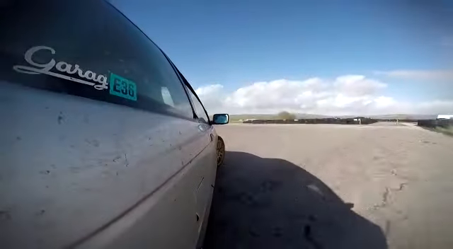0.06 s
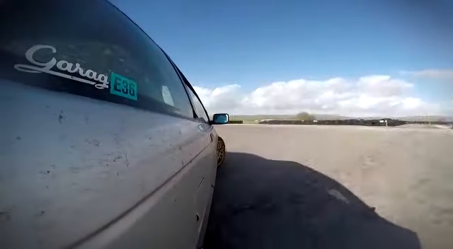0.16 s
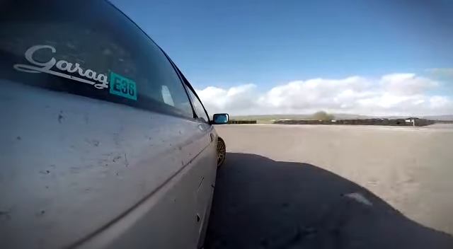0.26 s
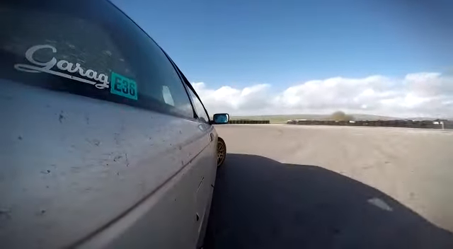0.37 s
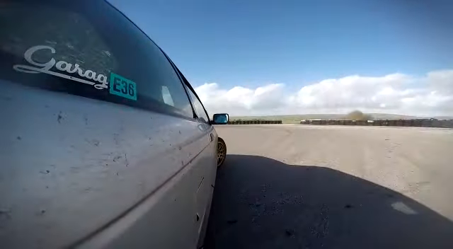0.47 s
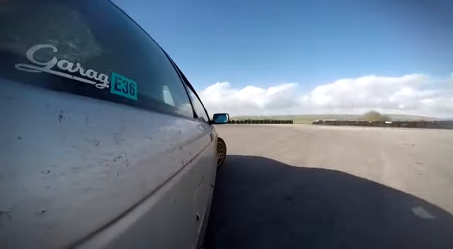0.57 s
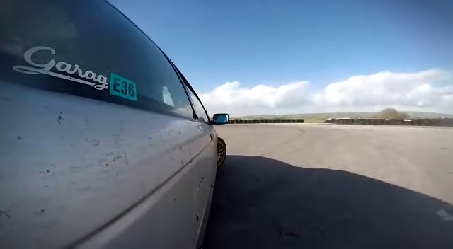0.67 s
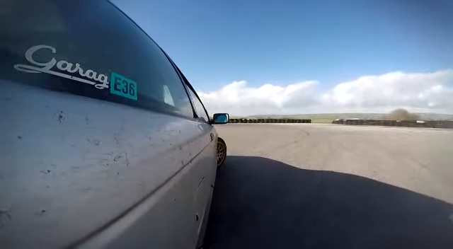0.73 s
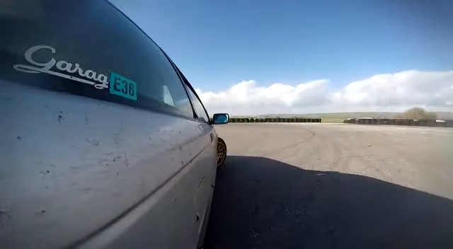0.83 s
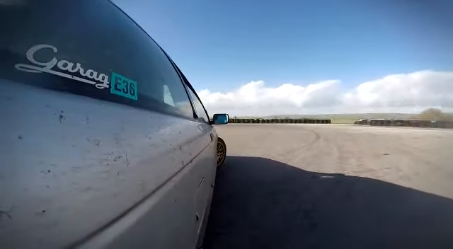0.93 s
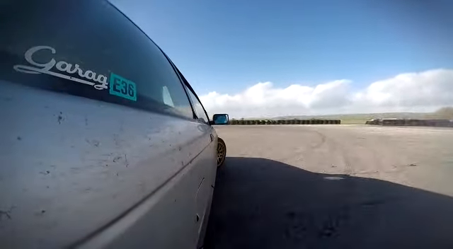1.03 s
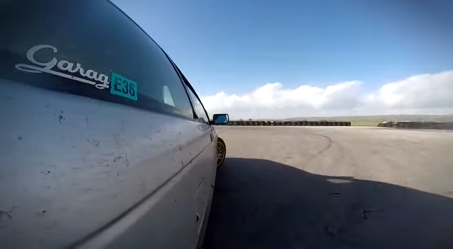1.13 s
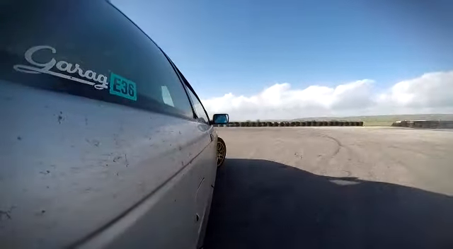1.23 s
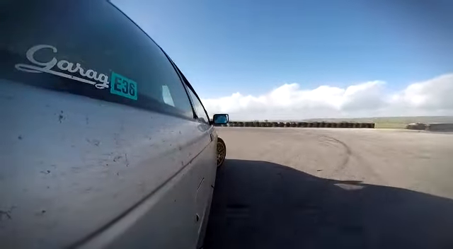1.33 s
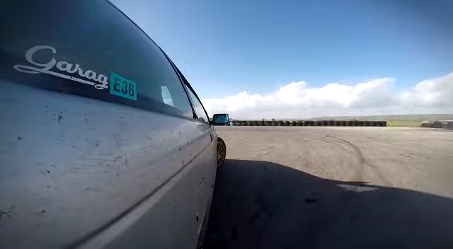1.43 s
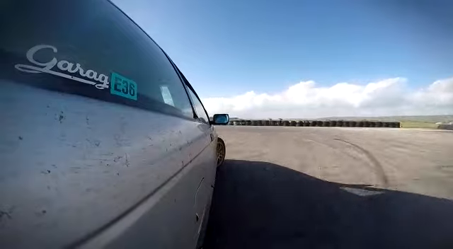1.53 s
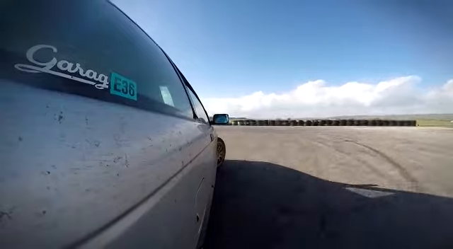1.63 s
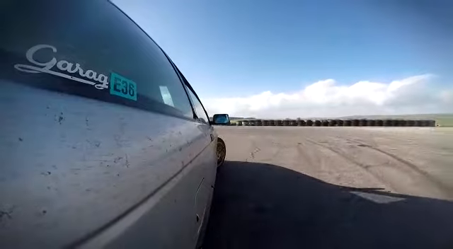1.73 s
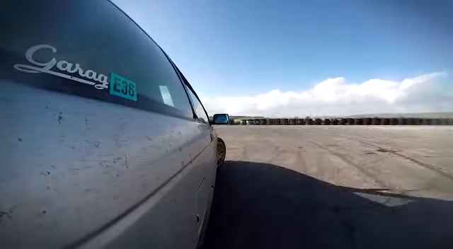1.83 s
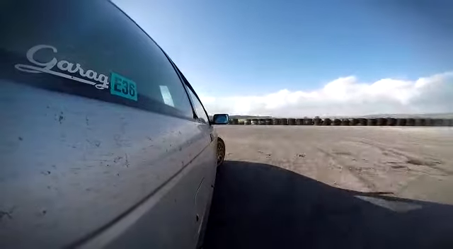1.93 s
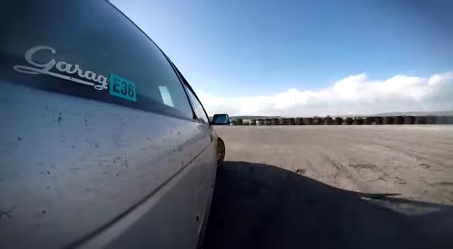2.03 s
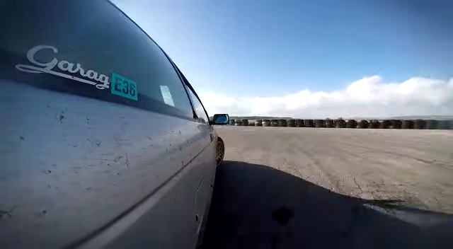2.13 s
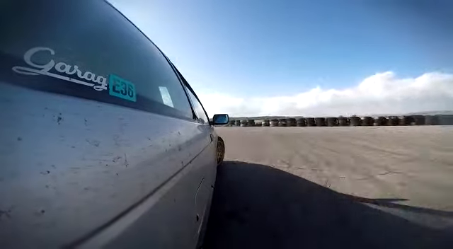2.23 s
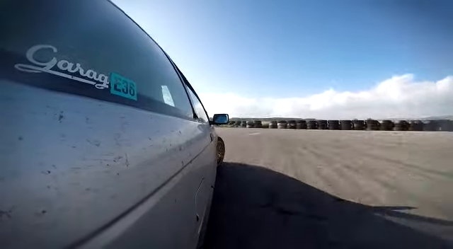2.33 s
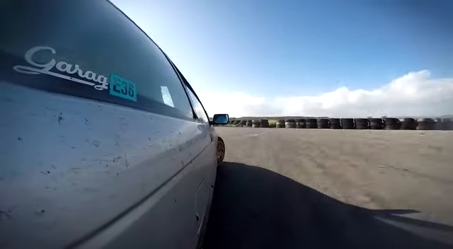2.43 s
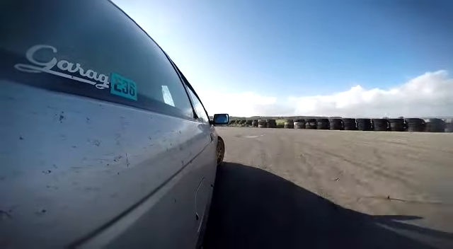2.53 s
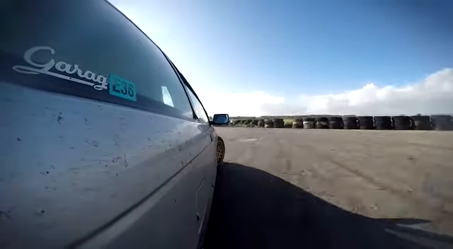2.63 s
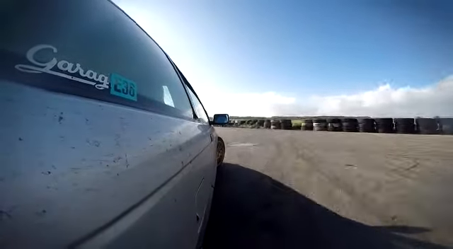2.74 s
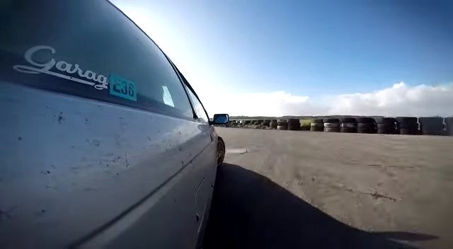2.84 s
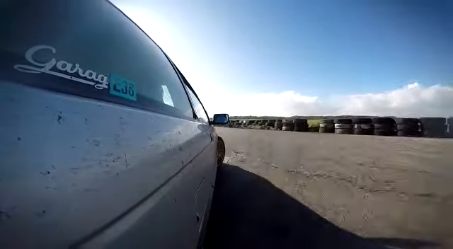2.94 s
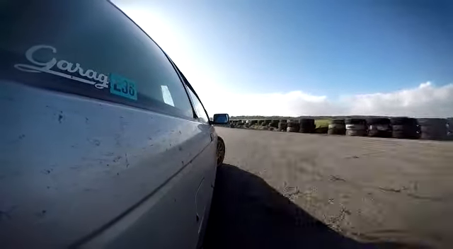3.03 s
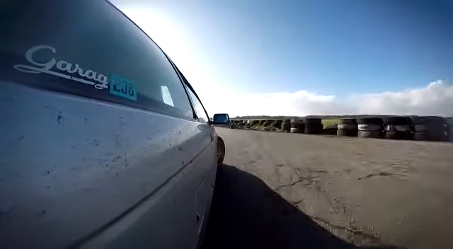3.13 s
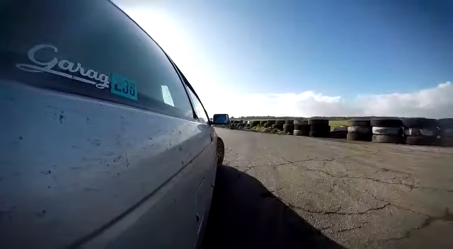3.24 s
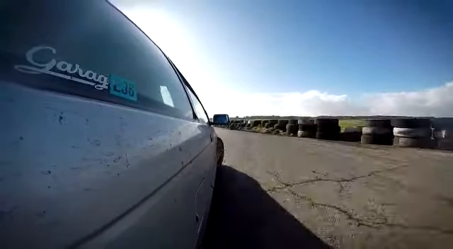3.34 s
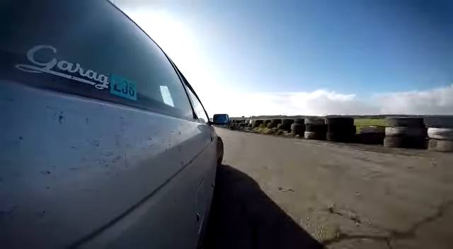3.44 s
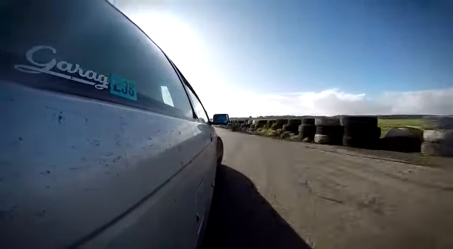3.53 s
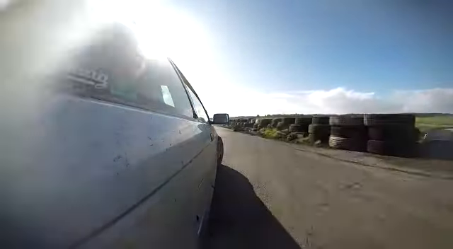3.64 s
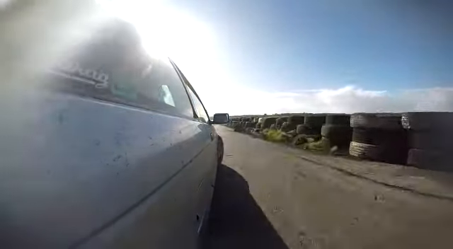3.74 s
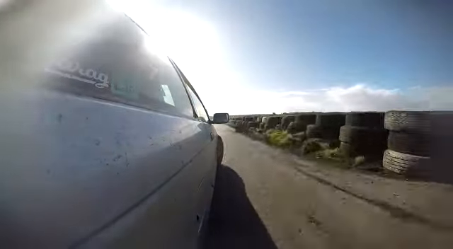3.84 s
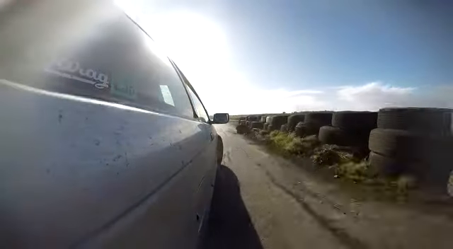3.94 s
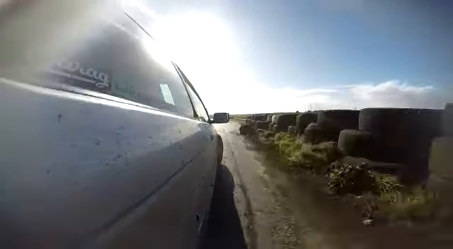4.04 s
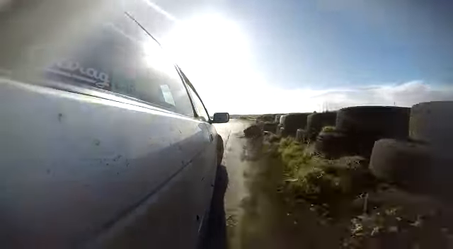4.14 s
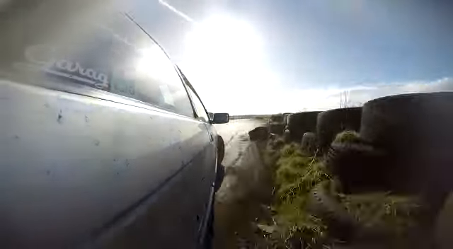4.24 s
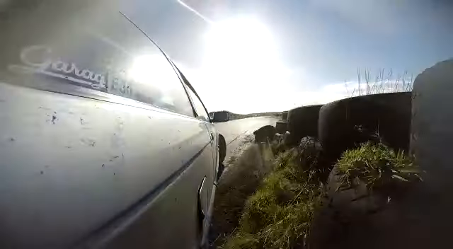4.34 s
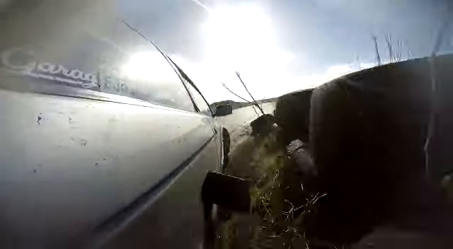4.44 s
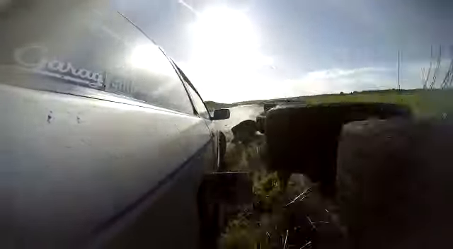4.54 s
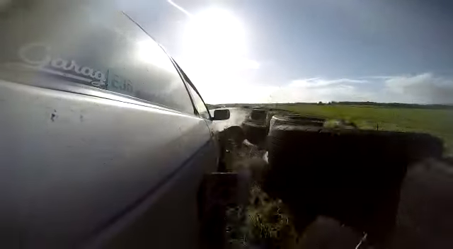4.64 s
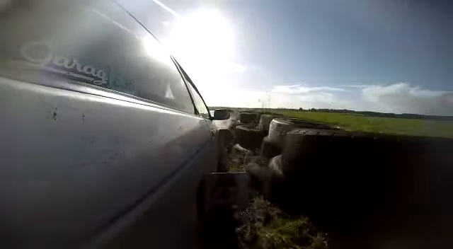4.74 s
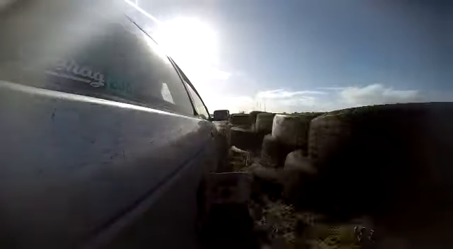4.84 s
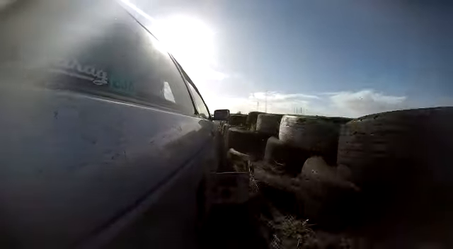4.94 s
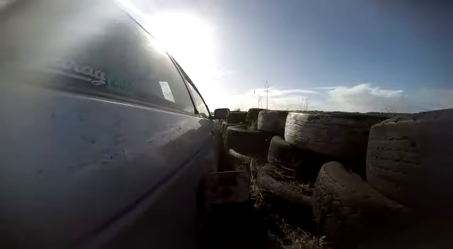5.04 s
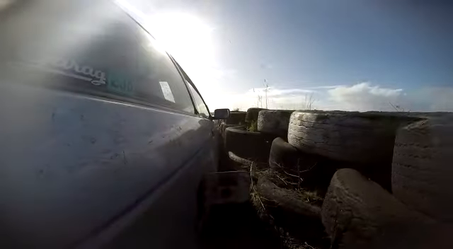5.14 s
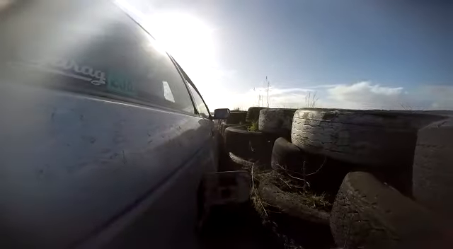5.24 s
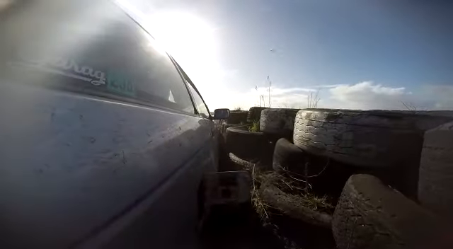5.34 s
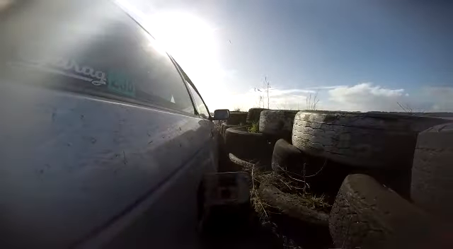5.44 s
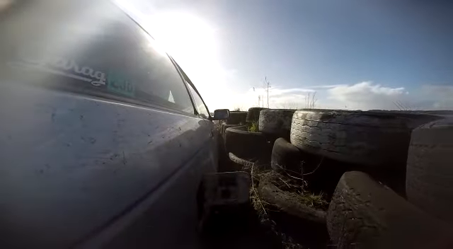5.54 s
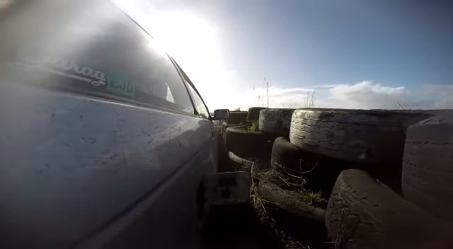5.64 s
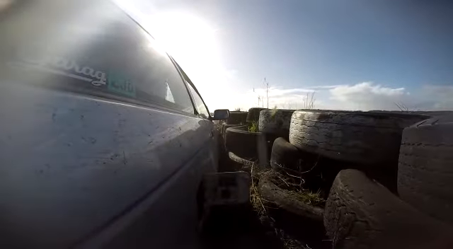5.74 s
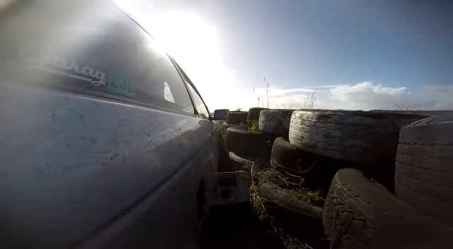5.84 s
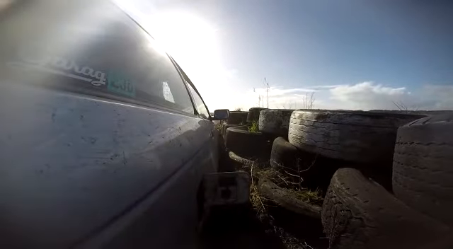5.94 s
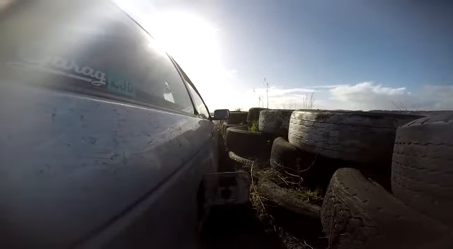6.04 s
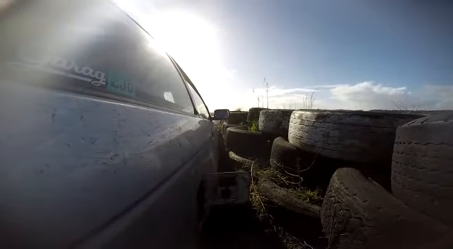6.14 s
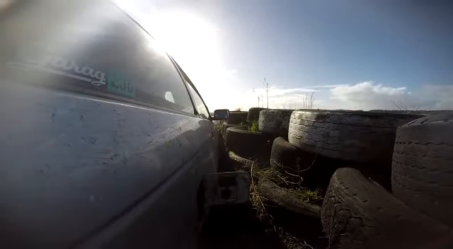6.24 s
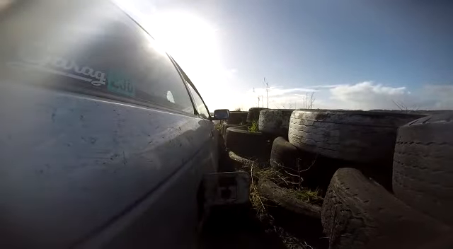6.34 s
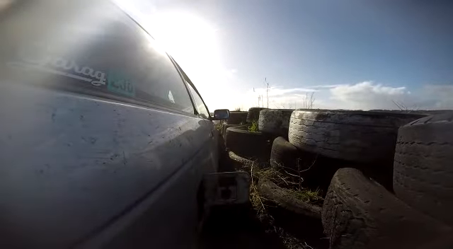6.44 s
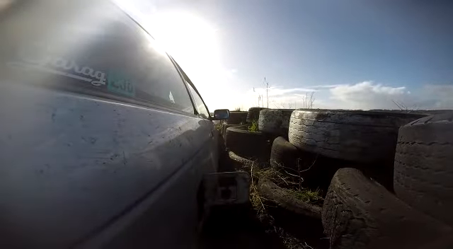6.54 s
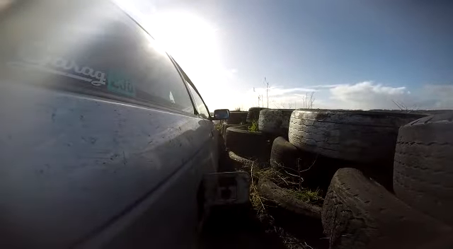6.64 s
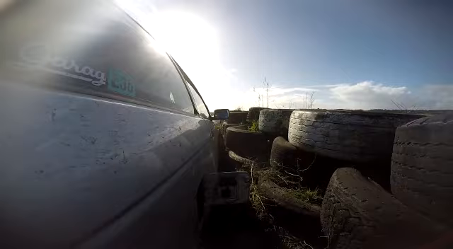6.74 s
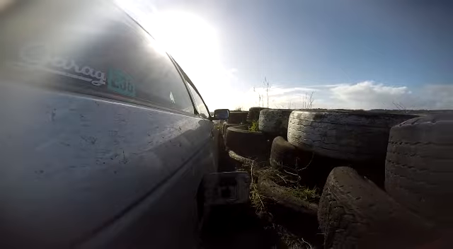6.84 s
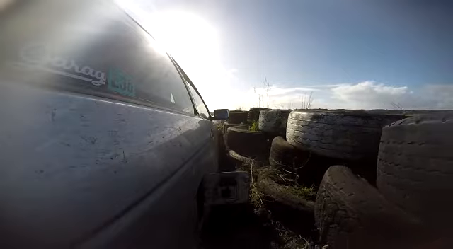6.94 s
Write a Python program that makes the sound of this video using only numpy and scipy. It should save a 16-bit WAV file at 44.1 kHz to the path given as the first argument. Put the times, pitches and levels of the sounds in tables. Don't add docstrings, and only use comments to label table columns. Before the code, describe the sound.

From 0 to about 3.9 seconds a car slides hard: a fluttering tyre squeal around 850 to 980 hertz wavers over a second, lower rubber tone, with scrubbing roar, bassy wind booms and a growling engine that climbs until about 2 seconds, dips, then surges again near 3.6. At 3.9 to 4.3 the tyres lock into a purer rising screech, which cuts off. Around 4.45 to 4.7 come heavy, dense thumps and crunches against stacked tyres, with hard knocks; another thud lands near 4.9. The road roar collapses and engine pitch falls to a low idle by 5.6, with fine hiss, small knocks and grit ticks until about 6.2. From 6.4 the engine blips and revs upward, rattling panels, with a thump near 6.8, ending abruptly mid-rev at 7. Everything sounds close, boxy and dull, inside a sealed case outdoors.

```python
import sys
import numpy as np
from scipy import signal
from scipy.fft import rfft, irfft, next_fast_len
from scipy.io import wavfile
from scipy.ndimage import uniform_filter1d

SR = 44100
rng = np.random.default_rng(int(sys.argv[2]) if len(sys.argv) > 2 else 0)


def makeup_ratio(level_db):
    decades = np.asarray(level_db, float) / 20
    return 10 ** decades


def transcribe(u):
    v = np.clip(np.atleast_2d(u).T, -1, 1)
    q = np.round(v * 32767).astype(np.int16)
    wavfile.write(sys.argv[1], SR, q)


N = 308259
T = np.arange(N) / SR
SLIDE_END_S = 4.34


def evened(x):
    return x / np.sqrt(np.mean(abs(x) ** 2) + 1e-20)


def per_band(x, lo, hi):
    band = signal.butter(4, [lo, hi], "band", fs=SR, output="sos")
    return x / np.std(signal.sosfilt(band, x))


def curves(rows):
    s, *columns = np.transpose(rows)
    return [np.interp(T, s, c) for c in columns]


def read(points, hz):
    f, value = np.transpose(points)
    return np.interp(np.log(hz + 1), np.log(f + 1), value)


def wander(width_hz, size=16):
    r = np.clip(np.exp(-np.pi * width_hz * size / SR), 0, 1 - 1e-9)
    a, b = rng.standard_normal((N // size + 3000, 2)).T
    z = signal.lfilter([1], np.convolve([1, -r], [1, -r]), a + 1j * b)[2998:]
    return evened(np.interp(np.arange(N) / size, np.arange(len(z)), z))


def steadied(z, loose):
    return evened(z * (abs(z) + 1e-3) ** (np.clip(loose, 0, 1) - 1))


def turn(hz):
    return np.exp(2j * np.pi * np.cumsum(hz * np.ones(N)) / SR)


def noise(shape_db, size, patchy_db, flicker_db):
    hop = size // 4
    frames, hz = N // hop + 5, np.fft.rfftfreq(size, 1 / SR)
    a, b, patches = rng.standard_normal((frames, len(hz), 3)).T
    patches = uniform_filter1d(patches, size=8, axis=0)
    patches = evened(uniform_filter1d(patches, size=12, axis=1))
    flicker = evened(uniform_filter1d(rng.standard_normal(frames), size=6))
    at = np.minimum(np.arange(frames) * hop, N - 1)
    db = shape_db(hz[:, None], at) + patchy_db * patches + flicker_db * flicker
    return signal.istft((a + 1j * b) * makeup_ratio(db), nperseg=size, noverlap=size - hop)[1][:N]


def joined(*powers):
    return np.sqrt(sum(powers))


def finely(power):
    return np.interp(T, T[::32], power(T[::32]))


def presses(rows, edge_s):
    def power(t):
        total = 0
        for s, length, db in rows:
            hold = np.clip(np.minimum(t - s, s + length - t) / edge_s + 1, 0, 1)
            total = total + (makeup_ratio(db) * hold) ** 2
        return total
    return finely(power)


# (time [s], firing rate [Hz])
SPEED_CURVE = [(0, 215), (.3, 244), (.5, 230), (.9, 271), (1.3, 295), (2.03, 312), (2.3, 273), (2.68, 203),
               (3, 225), (3.2, 227), (3.58, 268), (3.73, 232), (4.3, 179), (4.6, 142), (4.75, 129),
               (5.14, 112), (5.4, 92), (5.6, 66)]
# (time [s], firing rate [Hz])
LAST_REV = [(6.28, 65), (6.4, 74), (6.5, 83), (6.66, 125), (6.72, 135), (6.8, 140), (6.87, 152),
            (6.95, 165), (6.99, 167)]
# (start [s], length [s], throttle [dB])
PEDAL_PRESSES = [(-.1, .35, -30), (.72, 1.31, -30.5), (2.2, .05, -30), (2.76, .5, -30.5), (3.4, .18, -31),
                 (3.82, .55, -37), (4.78, .1, -33), (5.55, .6, -42), (6.33, .04, -34), (6.44, .05, -26),
                 (6.56, .13, -22), (6.74, .06, -31), (6.87, .2, -22)]
# (time [s], pace [0-1])
CAR_PACE = [
    (0, 1),
    (4.34, 1),
    (4.39, .86),
    (4.47, .9),
    (4.54, 1),
    (4.56, .55),
    (4.67, .55),
    (4.76, 0),
    (6.99, 0),
]
SHUT_DB = -41
INTAKE_DB, INTAKE_HZ, INTAKE_SLOPE = -23.5, 100, 0.49


def controls():
    hz = curves(SPEED_CURVE + LAST_REV)[0]
    throttle = joined(makeup_ratio(SHUT_DB) ** 2, presses(PEDAL_PRESSES, .07))
    intake = throttle * makeup_ratio(INTAKE_DB) * np.minimum(hz / INTAKE_HZ, 1) ** INTAKE_SLOPE
    return hz, throttle, intake, curves(CAR_PACE)[0]


def squeal(rows, width_hz, loose, skirt_db, *overtones_db):
    hz, db = curves(rows)
    core = steadied(wander(width_hz), loose)
    stray = makeup_ratio(skirt_db) * wander(250, size=4)
    slip = (core + stray) * turn(hz)
    cycle = slip / (abs(slip) + 0.25)
    tone = slip * (1 + sum(makeup_ratio(o) * cycle ** k for k, o in enumerate(overtones_db, 1)))
    start, end = rows[0][0], rows[-1][0]
    sliding = np.interp(T, [start - .05, start, end, end + .03], [0, 1, 1, 0])
    return makeup_ratio(db) * sliding * evened(tone.real)


# (time [s], slip pitch [Hz], level [dB])
NEAR_SQUEAL = [(0, 853.4, -16), (.64, 926, -16.5), (1.2, 953.4, -16), (1.65, 983.7, -18),
               (1.94, 954.8, -20), (2.23, 946.2, -15), (2.41, 900, -16.5), (2.9, 892, -16),
               (3.25, 897, -18.5), (3.52, 945, -17), (3.68, 877, -19.5), (3.85, 869.5, -18.5)]
# (time [s], slip pitch [Hz], level [dB])
INNER_SQUEAL = [(0, 795, -30.5), (.5, 789.3, -29), (.9, 799.5, -33), (1.25, 851, -25), (1.55, 799.5, -31.5),
                (1.72, 870.5, -23.5), (1.92, 869.5, -22.5), (2.1, 804, -30.5), (2.4, 788.4, -28.5),
                (2.75, 785.5, -24), (3.1, 776, -35), (3.5, 798.5, -34), (3.85, 782, -27)]
# (time [s], slip pitch [Hz], level [dB])
LOCKED_SQUEAL = [
    (3.88, 951, -19),
    (4.148, 1028, -16.5),
    (4.184, 1040, -37.5),
    (4.2, 1047, -23.5),
    (4.26, 1046, -15.5),
    (4.32, 1024, -25),
]
# (time [s], slip pitch [Hz], level [dB])
FAR_SQUEAL = [
    (3.95, 862, -25),
    (4.046, 853, -23),
    (4.068, 816, -23.5),
    (4.29, 853, -19.5),
    (4.32, 812, -33),
]


def tyres():
    near = squeal(NEAR_SQUEAL, 85, .62, -5, -14.5)
    inner = squeal(INNER_SQUEAL, 50, .75, -10, -6, -15, -15)
    locked = squeal(LOCKED_SQUEAL, 36, .7, -5, -14)
    far = squeal(FAR_SQUEAL, 36, .65, -10, -14)
    return near + inner + locked + far


ORDER_SIXTHS = [3, 5, 6, 8, 9, 12, 13, 15, 18, 21, 24, 27]
ORDER_LEVELS = [-14, -6, 0, -10, -4, -4, -8, -5, -6, -14, -12, -15]
# (frequency [Hz], level [dB])
EXHAUST_CURVE = [(40, 2), (85, 12), (130, 13), (170, 9), (215, 9), (265, -4), (305, 2), (340, -9),
                 (390, -2), (450, -4), (500, -9), (555, -3), (610, -11), (665, -4)]
UNEVEN_AT_REST = .2


def engine():
    hz, throttle, _, pace = controls()
    uneven = UNEVEN_AT_REST + (1 - UNEVEN_AT_REST) * pace
    spin = np.cumsum(hz * (1 + .003 * wander(12).real)) / SR
    out = np.zeros(N)
    for k, db in zip(ORDER_SIXTHS, ORDER_LEVELS):
        level = makeup_ratio(db + read(EXHAUST_CURVE, k / 6 * hz))
        if k % 3 or k == 3:
            level = level * uneven
        waver = 1 + .5 * uneven * wander(9).real
        out += level * waver * np.cos(2 * np.pi * (k / 6 * spin + rng.random()))
    return throttle * np.sqrt(2) * out


# (time [s], blow level [dB],
# brightness [dB], t60 [s])
BLOW_EVENTS = [(4.496, 4, -18, 0.082), (4.526, -1, -6.5, 0.25), (4.59, -12, -6.5, 0.3),
               (4.653, -3, -18, 0.2), (4.699, -18.5, -39, 0.032), (4.91, -7.5, -18.5, 0.57),
               (4.965, -7, -33, 0.14), (5.049, -18, -16, 0.55), (5.219, -20, -28, 0.56),
               (5.291, -15, -25, 0.094), (5.539, -21.5, -45, 0.38), (6.165, -20, -20, 0.39),
               (6.235, -7.5, -34, 0.22), (6.779, -9.5, -38, 0.15), (4.331, -13.5, 5, .3),
               (4.934, -12, -7.5, 0.18)]
# (frequency [Hz], level [dB], t60 [s])
SHELL_MODES = [(106, 3, 0.078), (157, 9.5, 0.063), (220, 8.5, 0.047), (294, -0.5, 0.043), (372, -4, 0.19),
               (508, -16, 0.15), (599, -17.5, 0.054)]


def blows():
    out, t = np.zeros(N + 12000), np.arange(12000) / SR
    ring = sum(makeup_ratio(db - 60 * t / t60) * np.sin(2 * np.pi * hz * t) for hz, db, t60 in SHELL_MODES)
    crunch = signal.butter(3, [500, 1000], "band", fs=SR, output="sos")
    for s, db, bright_db, t60 in BLOW_EVENTS:
        lumps = (rng.random((len(t) // 100, 2)) < .45).repeat(100, axis=0).T
        lumps = .5 + np.maximum(lumps, t < .012)
        attack = np.minimum(t / (.045 * t60), 1)
        burst = lumps * rng.standard_normal((2, len(t))) * makeup_ratio(-60 * t / t60) * attack
        low = signal.fftconvolve(burst[0], ring)[:len(t)]
        high = signal.sosfilt(crunch, burst[1])
        hit = low / abs(low).max() + makeup_ratio(bright_db - 6.5) * high / abs(high).max()
        out[round(s * SR):][:len(t)] += makeup_ratio(db) * hit
    return signal.sosfilt(signal.butter(2, 90, "high", fs=SR, output="sos"), out[:N])


def kicks(t60):
    def power(t):
        total = 0
        for s, db, _, _ in BLOW_EVENTS:
            rise = np.clip((t - s) / 0.0068, 0, 1)
            total = total + (makeup_ratio(db - 60 * np.clip(t - s, 0, 1) / t60) * rise) ** 2
        return total
    return finely(power)


# (time [s], level [dB], pitch [Hz], t60 [s])
KNOCK_EVENTS = [(4.498, -18, 2000, 0.033), (4.536, -23.5, 2300, .04), (4.544, -22, 1490, 0.039),
                (4.599, -31, 2640, .05), (4.649, -27.5, 1540, 0.036), (4.7, -31, 1770, 0.017),
                (4.912, -22, 517, 0.097), (4.945, -38, 2000, 0.061), (5.053, -34.5, 2980, 0.013),
                (5.16, -37, 1170, 0.049), (5.24, -47.5, 3200, .03), (5.296, -33, 690, .06),
                (5.297, -42, 2840, 0.024), (5.687, -48, 1060, 0.087), (5.764, -49, 1510, 0.031),
                (6.163, -43, 1105, .08), (6.235, -36, 1064, .14), (6.25, -20, 399, .1),
                (5.549, -25, 410, 0.084), (4.965, -35, 1010, 0.13), (6.777, -25, 1070, 0.049),
                (6.784, -13.5, 392, 0.083), (4.456, -12, 150, 0.1), (4.474, -2, 164, 0.072)]


def knocks():
    out, t = np.zeros(N), np.arange(4000) / SR
    spreads = rng.uniform(1.06, 1.14, len(KNOCK_EVENTS))
    for (s, db, hz, t60), apart in zip(KNOCK_EVENTS, spreads):
        pair = np.sin(2 * np.pi * hz * apart ** .5 * t) + np.sin(2 * np.pi * hz / apart ** .5 * t)
        out[round(s * SR):][:len(t)] += makeup_ratio(db - 60 * t / t60) * np.minimum(t * hz / 2, 1) * pair
    return out


# (frequency [Hz], width [Hz])
WING_MODES = [(60, 5.2), (125, 15), (229, 10.5)]
# (start [s], length [s], level [dB])
GUST_EVENTS = [(.03, 0.064, -9), (.17, .3, -12), (.74, 0.12, -10), (1, 0.092, -14), (1.39, 0.11, -10),
               (1.72, .3, -10), (2.08, 0.17, -16), (2.32, .1, -10), (2.54, 0.22, -10), (2.82, 0.14, -10.5),
               (3.02, 0.19, -14), (3.33, 0.26, -13), (3.68, 0.28, -16.5), (4.32, 0.05, -16),
               (4.47, 0.23, -13), (4.95, .13, -13.5), (5.8, 0.36, -16), (6.25, 0.19, -17.5)]
# (start [s], length [s], level [dB])
SHUDDER_EVENTS = [
    (1.25, 0.57, -21),
    (1.95, 0.042, -24),
    (2.22, 0.14, -19),
    (2.6, 0.24, -21.5),
    (3.05, 0.17, -22.5),
    (3.65, .15, -19.5),
    (3.92, 0.31, -19.5),
    (5.45, 0.56, -19),
]
# (start [s], length [s], level [dB])
THRUM_EVENTS = [
    (.05, 0.087, -22),
    (.9, 0.17, -21.5),
    (2.24, 0.036, -19.5),
    (3.79, 0.074, -12),
    (4.05, 0.066, -22),
    (4.96, 0.067, -14),
    (5.55, 0.022, -17.5),
]
MODE_KICKS = (-27, -12.5, -6.5)
GUST_S, BOOM_REST_DB = 0.044, -23
MODE_REST_DB, MODE_PACE_DB = (-33, -38.5), (4, 13)
COUPLING_DB, PULL_HZ = (7, 4), (4.7, 6)


def wing_booms(kick):
    hz, throttle, _, pace = controls()

    def near(f, w):
        return sum(makeup_ratio(db) ** 2 / (1 + ((k / 6 * hz - f) / w) ** 2) ** 2
                   for k, db in zip(ORDER_SIXTHS[:8], ORDER_LEVELS))

    shaken = [makeup_ratio(BOOM_REST_DB) ** 2 + presses(GUST_EVENTS, GUST_S)]
    upper = zip(MODE_REST_DB, MODE_PACE_DB, COUPLING_DB, PULL_HZ, WING_MODES[1:], (SHUDDER_EVENTS, THRUM_EVENTS))
    for rest, added, coupling, pull, (f, _), events in upper:
        driven = (makeup_ratio(coupling) * throttle) ** 2 * near(f, pull)
        shaken.append(makeup_ratio(rest + added * pace) ** 2 + driven + presses(events, GUST_S))
    out = np.zeros(N)
    for power, kick_db, (f, w) in zip(shaken, MODE_KICKS, WING_MODES):
        level = joined(power, makeup_ratio(kick_db) ** 2 * kick)
        out += level * (steadied(wander(w), 0.5) * turn(f)).real
    return out


# (frequency [Hz], level [dB])
BUFFET_CURVE = [(15, 10.5), (30, 19), (80, 13.5), (150, 3), (260, 9.5), (330, 1.5), (450, 0), (600, -17),
                (1000, -25.5), (2000, -32.5)]
# (start [s], length [s], level [dB])
SILL_SCRAPE = [
    (4.33, 0.043, -26),
]
BUFFET_REST_DB, BUFFET_PACE_DB, BUFFET_INTAKE_DB, BUFFET_KICK_DB = -38, 7, 21, -18.5
WIND_REST_DB, WIND_PACE_DB, WIND_TURN_DB = -4.5, 6, 0.45


def panel():
    _, _, intake, pace = controls()
    kick = kicks(0.22)
    booms = wing_booms(kick)
    wind_db = WIND_REST_DB + (WIND_PACE_DB + WIND_TURN_DB * T) * pace - 8 * np.clip((T - 6.3) / 0.81, 0, 1)

    def shape(hz, at):
        return read(BUFFET_CURVE, hz) + wind_db[at] / (1 + (hz / 200) ** 6)

    buffet = noise(shape, size=2048, patchy_db=1.2, flicker_db=1.2)
    moving = makeup_ratio(BUFFET_REST_DB + BUFFET_PACE_DB * pace) ** 2
    revving = (makeup_ratio(BUFFET_INTAKE_DB) * intake) ** 2 * (1 - pace)
    level = joined(moving, revving, makeup_ratio(BUFFET_KICK_DB) ** 2 * kick, presses(SILL_SCRAPE, GUST_S))
    return booms + makeup_ratio(-2.5) * level * per_band(buffet, 270, 700)


# (frequency [Hz], width [Hz],
# level over intake [dB])
RATTLE_MODES = [(214.5, 5.2, 27), (228.7, 8.8, 28), (369, 24, 22.5), (459, 51, 19), (527, 27, 18.5),
                (630, 35, 8.5), (766, 46, 2), (1960, 90, 0), (2130, 120, -0.5)]


def rattle():
    _, throttle, intake, pace = controls()
    push = intake * (1 - pace) * (1 - makeup_ratio(SHUT_DB) / throttle)
    return push * sum(makeup_ratio(db) * (steadied(wander(w), 0.74) * turn(hz)).real for hz, w, db in RATTLE_MODES)


MOUNT_HZ, MOUNT_WIDTH_HZ = 1040, 85
MOUNT_REST_DB, MOUNT_INTAKE_DB, MOUNT_KICK_DB = -62.5, 6.5, -31.5


def mount():
    _, _, intake, pace = controls()
    revving = (makeup_ratio(MOUNT_INTAKE_DB) * intake * (1 - pace)) ** 2
    level = joined(makeup_ratio(MOUNT_REST_DB) ** 2, revving, makeup_ratio(MOUNT_KICK_DB) ** 2 * kicks(0.34))
    return level * (wander(MOUNT_WIDTH_HZ) * turn(MOUNT_HZ)).real


# (frequency [Hz], width [Hz], level [dB])
CASE_MODES = [(1355, 60, 5), (1440, 45, -14), (1545, 90, 6), (1790, 200, 4), (2100, 160, -4),
              (2365, 100, 4), (2600, 210, -5), (3235, 350, 5), (4510, 250, 6), (5300, 260, 1)]


def case_db(hz):
    return sum(db / (1 + (2 * (hz - f) / w) ** 2) for f, w, db in CASE_MODES)


def through_case(x, edge_hz):
    size = next_fast_len(N + 4096)
    hz = np.fft.rfftfreq(size, 1 / SR)
    response = makeup_ratio(case_db(hz)) / np.sqrt(1 + (hz / edge_hz) ** 8)
    return irfft(rfft(x, size) * response, size)[:N]


# (frequency [Hz], level [dB])
ROAR_CURVE = [(300, -17), (600, -9), (1000, 10.5), (2000, 2), (3000, 1.5), (4000, -7.5), (5500, -17),
              (7000, -19), (8200, -30.5), (10000, -41.5), (15000, -78.5)]
# (start [s], length [s], level [dB])
ROAR_RASPS = [
    (6.42, .12, -48.5),
    (6.56, 0.2, -50.5),
    (5.74, 0.074, -62),
    (6.17, 0.11, -60),
]
SCRUB_REST_DB, SCRUB_PACE_DB, SCRUB_KICK_DB, SLIDE_MIDDLE_DB = -61, 29, -47.5, 3


def roar():
    _, _, intake, pace = controls()
    sliding = np.clip((SLIDE_END_S - T) / 0.027 + 1, 0, 1)
    middle_db = -1 + 4 * np.clip((T - 6.3) / .1, 0, 1) + SLIDE_MIDDLE_DB * sliding

    def shape(hz, at):
        return read(ROAR_CURVE, hz) + case_db(hz) + (middle_db[at] - 7) / (1 + (hz / 2400) ** 10)

    scrub = makeup_ratio(SCRUB_REST_DB + SCRUB_PACE_DB * pace) ** 2
    kicked = makeup_ratio(SCRUB_KICK_DB) ** 2 * kicks(0.41)
    level = joined(scrub, intake ** 2, kicked, presses(ROAR_RASPS, GUST_S))
    return level * per_band(noise(shape, size=1024, patchy_db=1.5, flicker_db=1.6), 2500, 5000)


# (time [s], level [dB])
GRIT_TICKS = [(4.543, -45.5), (4.6748, -48.5), (4.7294, -47.5), (4.923, -45), (4.988, -46), (5.011, -47),
              (5.038, -39.5), (5.173, -45), (5.44, -45.5), (5.4644, -44.5), (5.764, -41), (5.842, -43),
              (5.904, -38.5), (5.953, -51.5), (6.005, -50), (6.015, -36.5), (6.05, -43.5), (6.073, -50.5),
              (6.237, -53.5)]
HISS_REST_DB, HISS_INTAKE_DB, HISS_KICK_DB, HISS_ON_S = -65, -9, -54.5, 4.42


def grit():
    ticks, t = np.zeros(N), np.arange(200) / SR
    for s, db in GRIT_TICKS:
        ticks[round(s * SR):][:len(t)] += makeup_ratio(db + 3.5 - 60 * t / 0.0071) * rng.standard_normal(len(t))
    intake = controls()[2]
    kicked = makeup_ratio(HISS_KICK_DB) ** 2 * kicks(0.44)
    level = joined(makeup_ratio(HISS_REST_DB) ** 2, (makeup_ratio(HISS_INTAKE_DB) * intake) ** 2, kicked)
    flutter = makeup_ratio(5.3 * wander(18).real)
    level = level * np.clip((T - HISS_ON_S) / .08, 0, 1) ** 2 * flutter
    hiss = level * signal.lfilter([1], [1, -.75], rng.standard_normal(N))
    return signal.sosfilt(signal.butter(2, 3000, "high", fs=SR, output="sos"), ticks) + hiss


def scene():
    car = engine() + tyres() + panel() + rattle() + mount()
    crash = blows() + knocks()
    return (through_case(car + crash, 3800) + roar() + grit())[None]


def low_pass(x):
    return signal.sosfilt(signal.butter(12, 14600, fs=SR, output="sos"), x)


def record(dry):
    rounded = dry / (1 + (dry / .95) ** 4) ** (1 / 4)
    mix = rounded * np.minimum((T[-1] - T) / .004, 1)
    return low_pass(mix)


dry = scene()
out = record(dry)
transcribe(out)
```